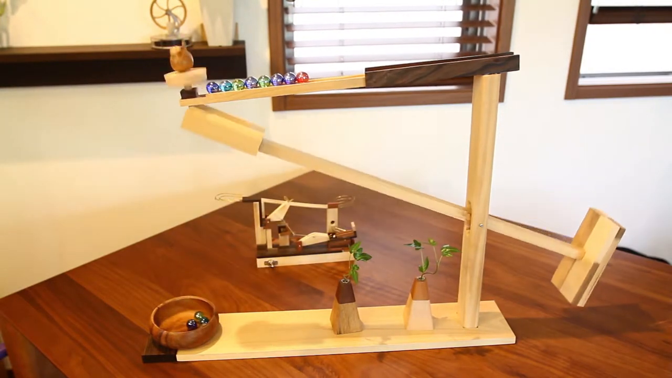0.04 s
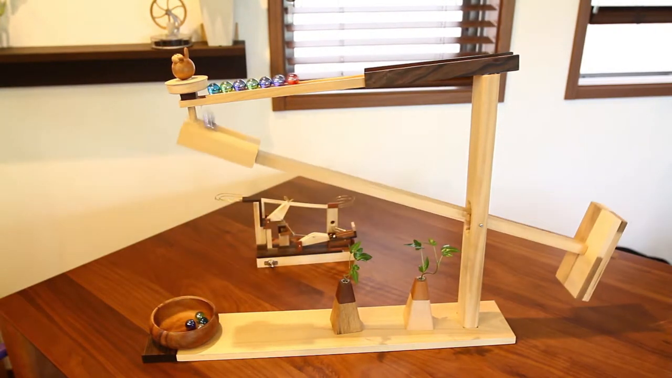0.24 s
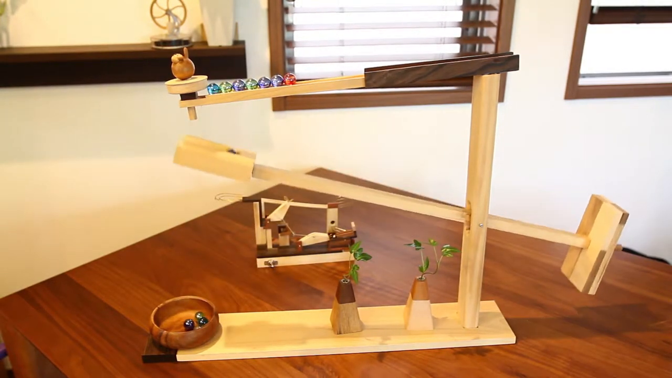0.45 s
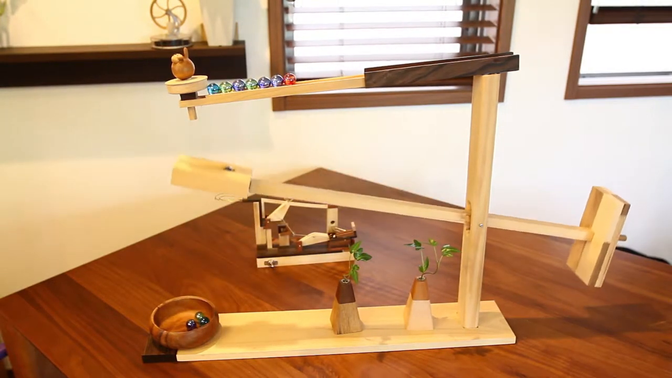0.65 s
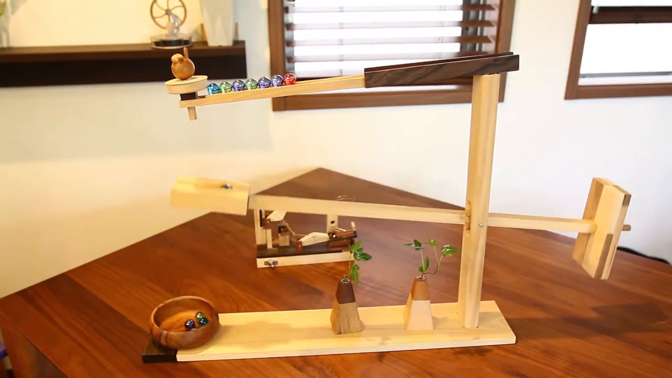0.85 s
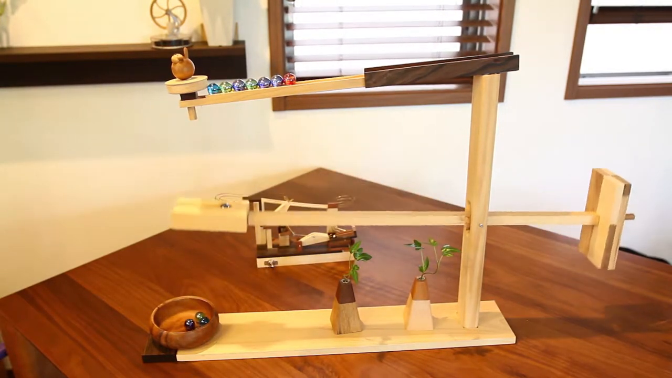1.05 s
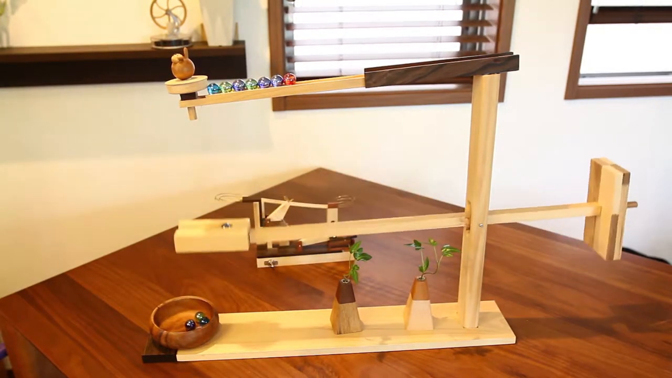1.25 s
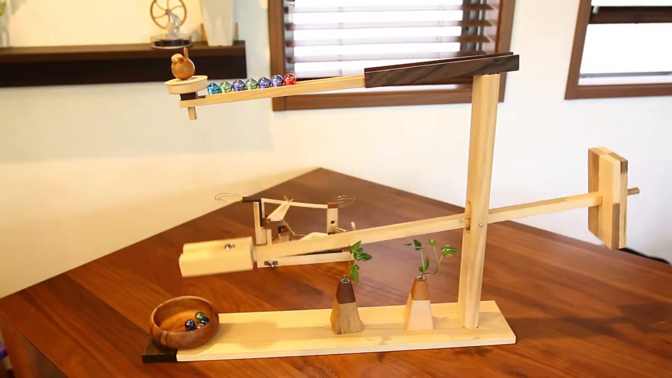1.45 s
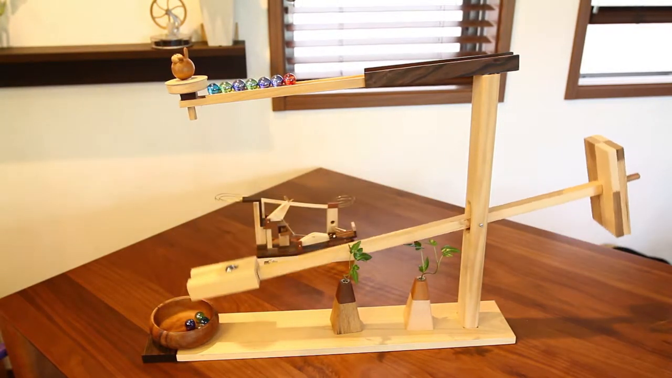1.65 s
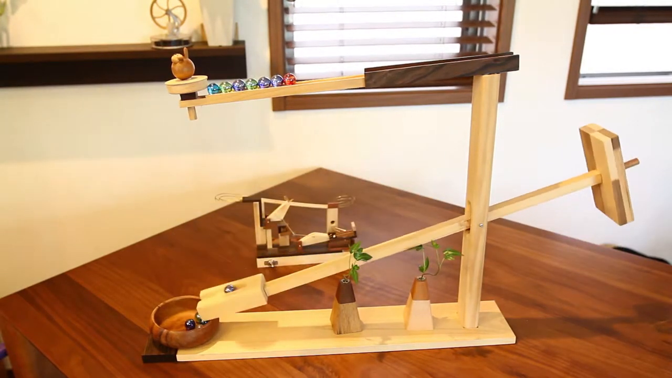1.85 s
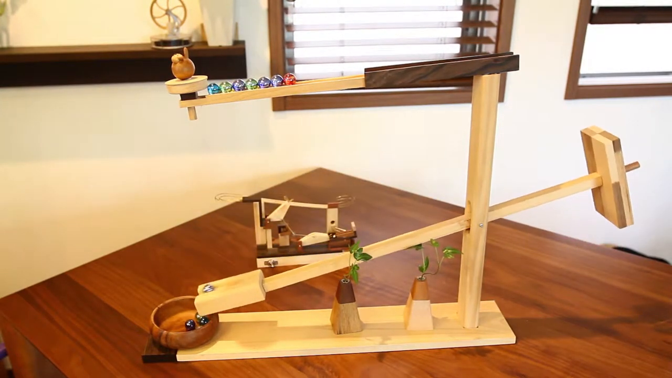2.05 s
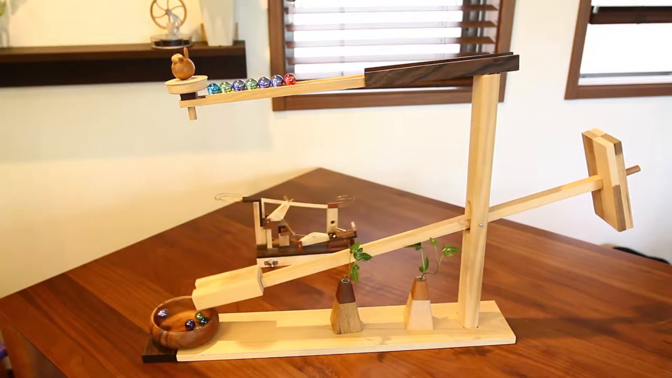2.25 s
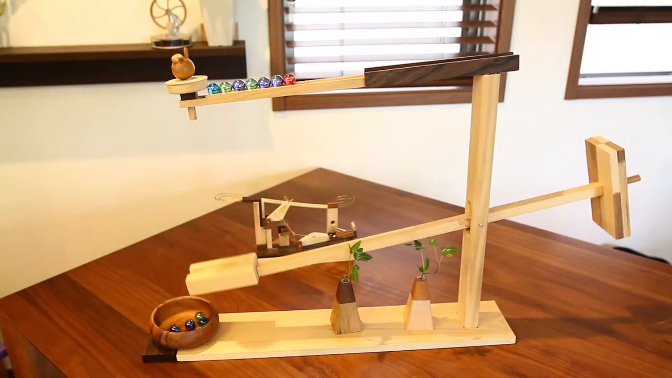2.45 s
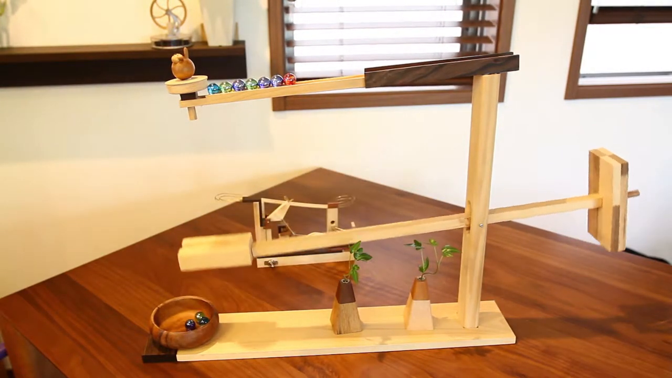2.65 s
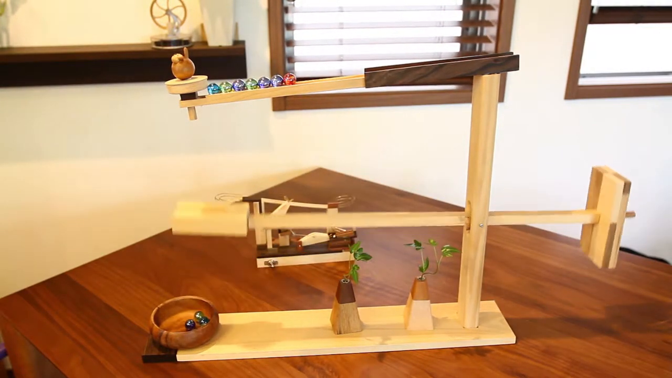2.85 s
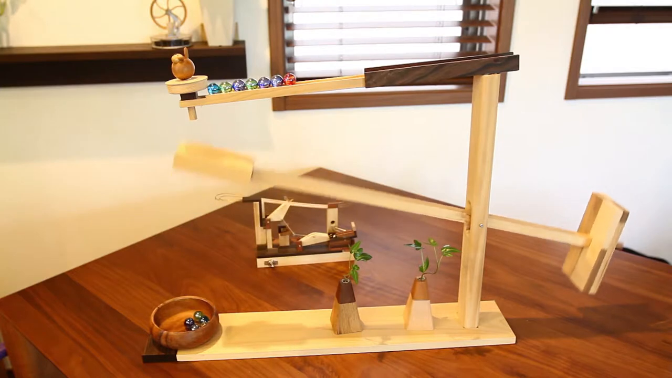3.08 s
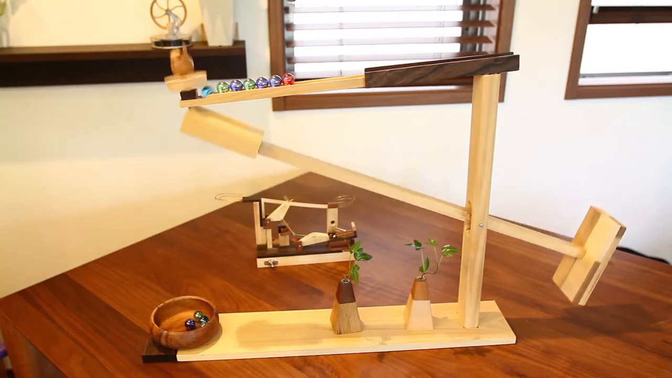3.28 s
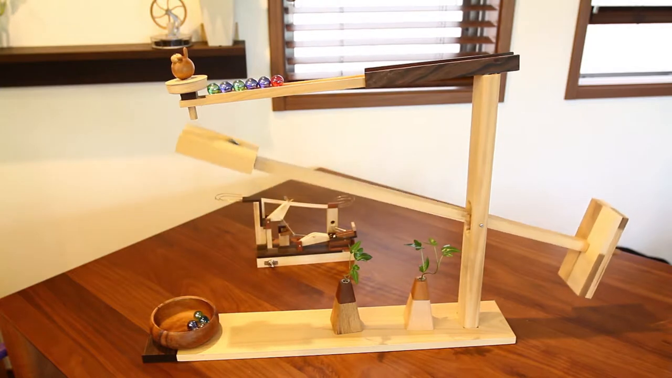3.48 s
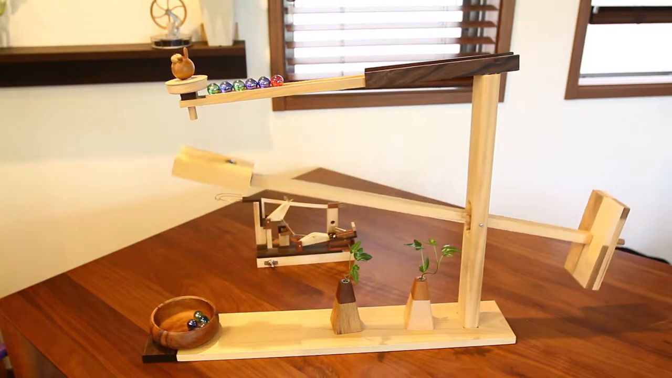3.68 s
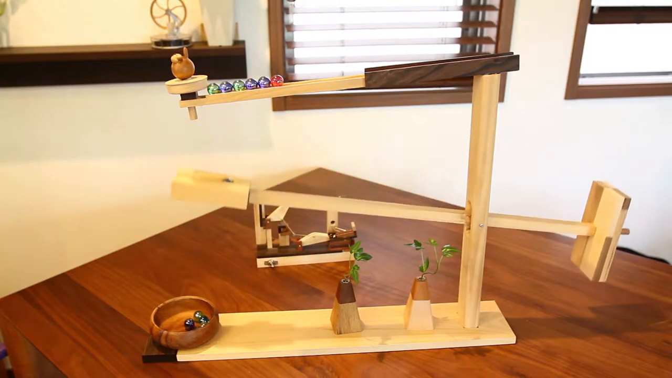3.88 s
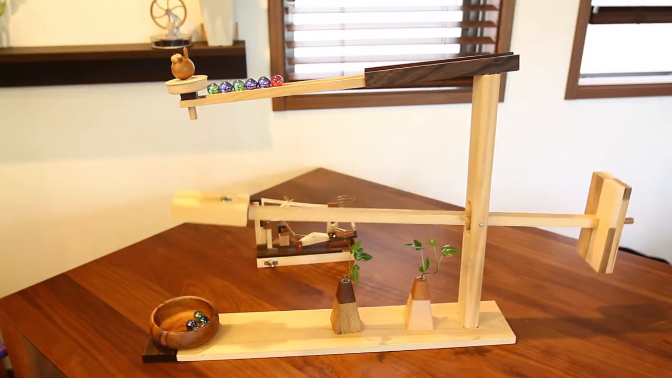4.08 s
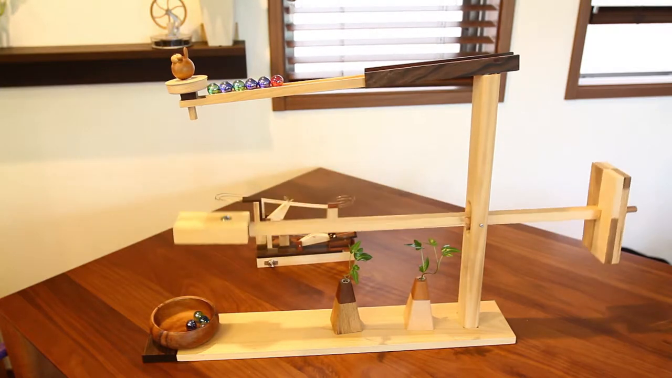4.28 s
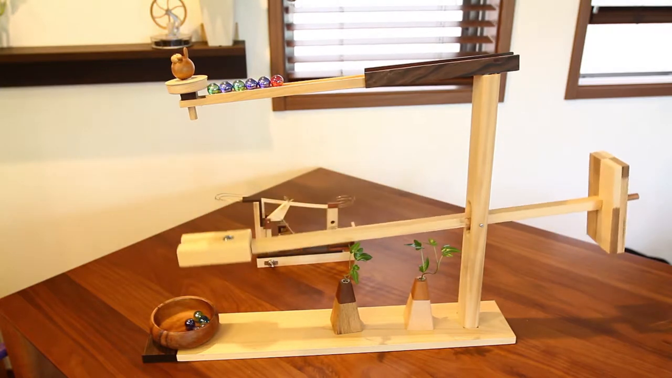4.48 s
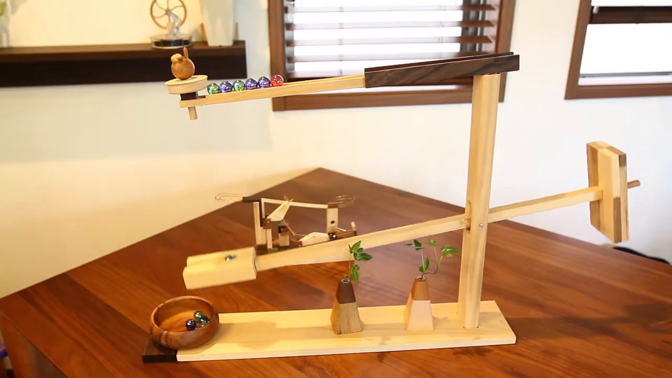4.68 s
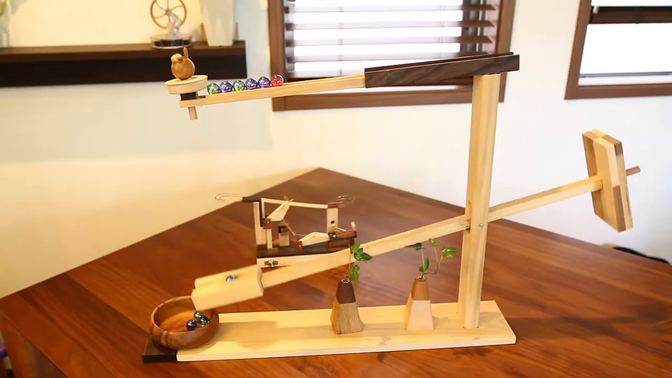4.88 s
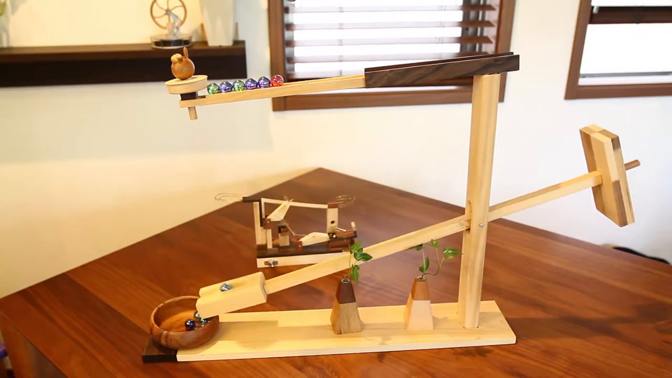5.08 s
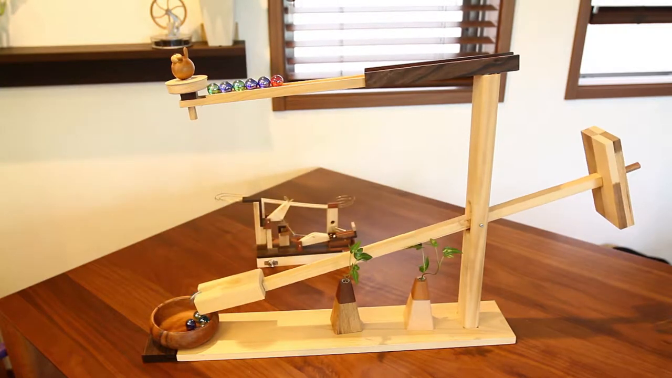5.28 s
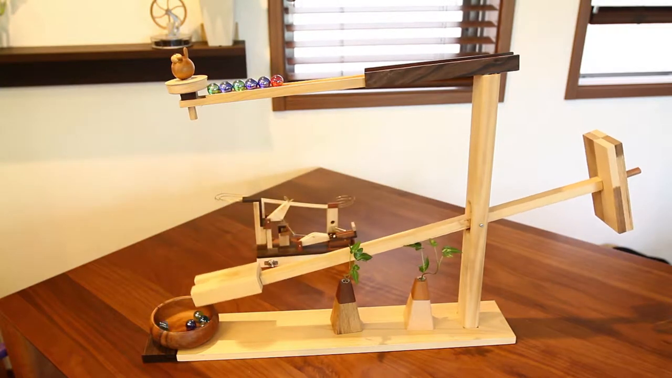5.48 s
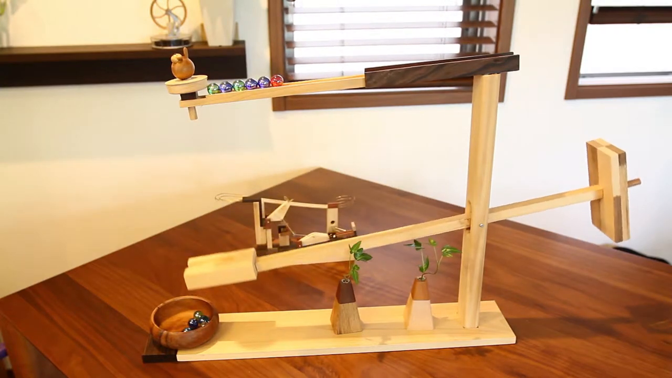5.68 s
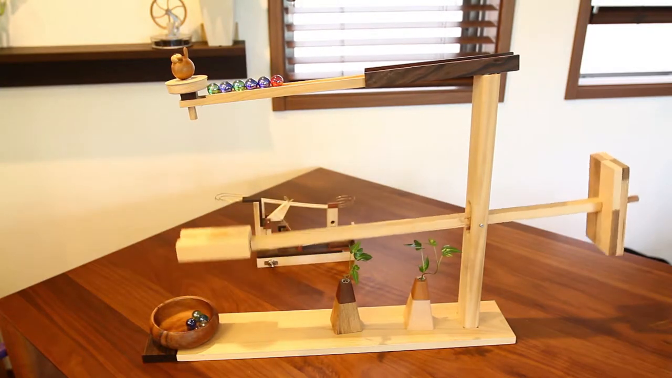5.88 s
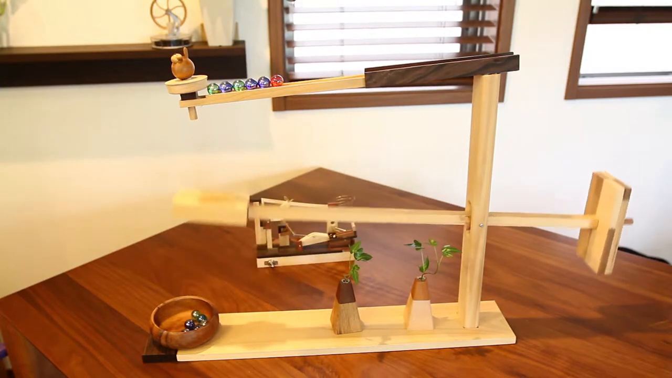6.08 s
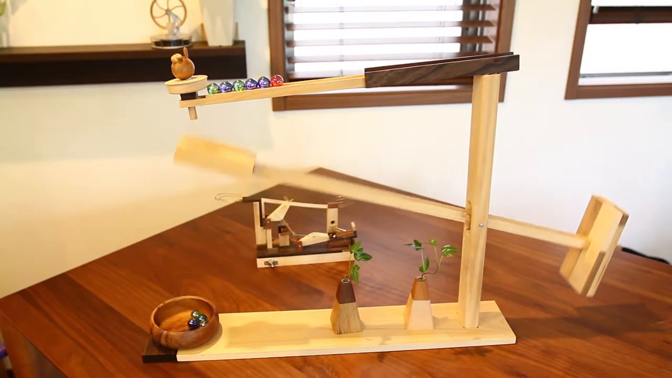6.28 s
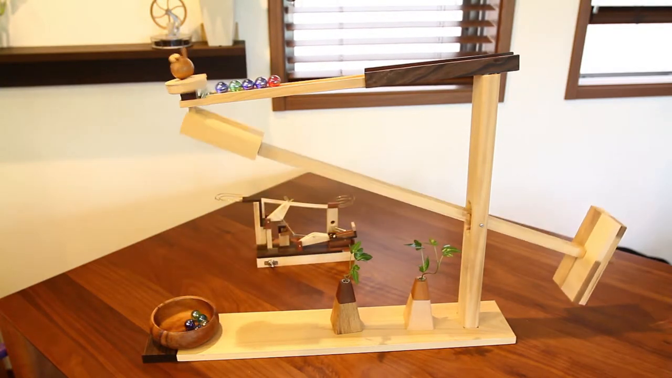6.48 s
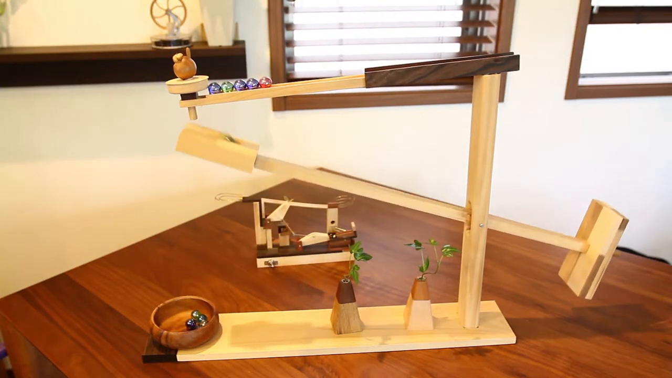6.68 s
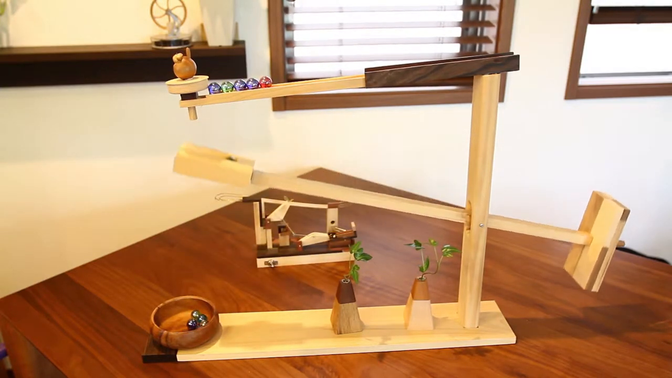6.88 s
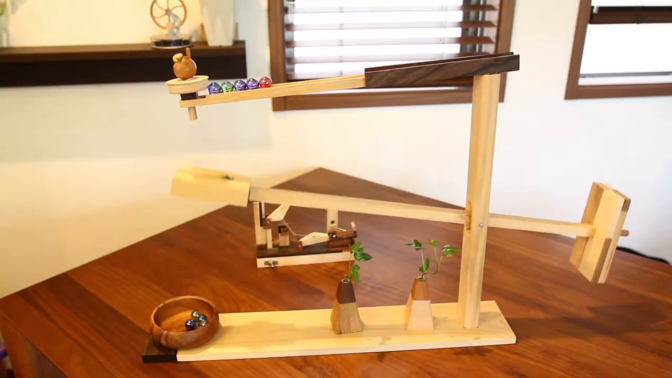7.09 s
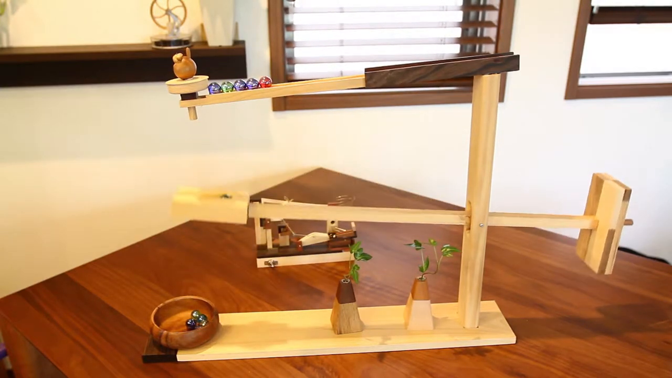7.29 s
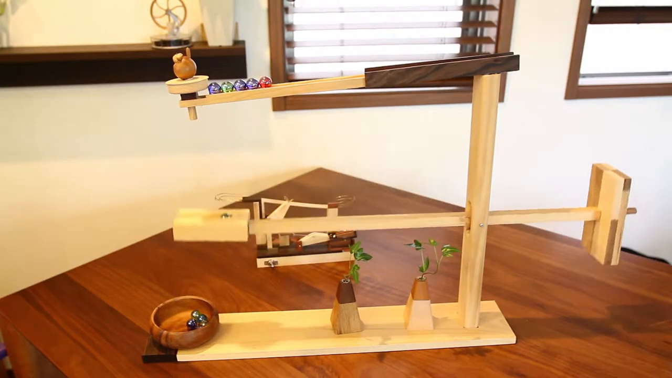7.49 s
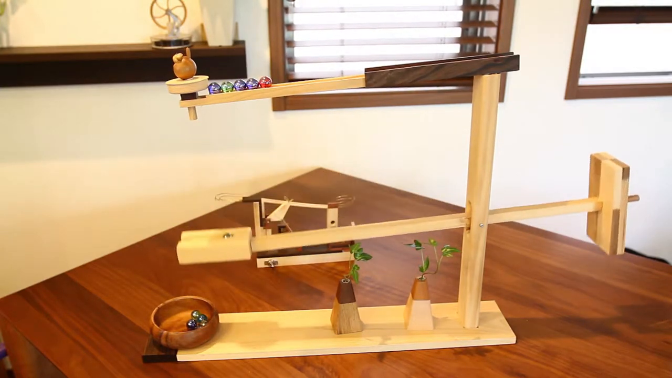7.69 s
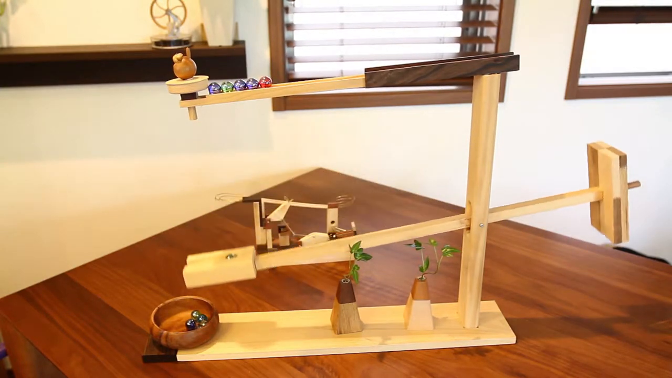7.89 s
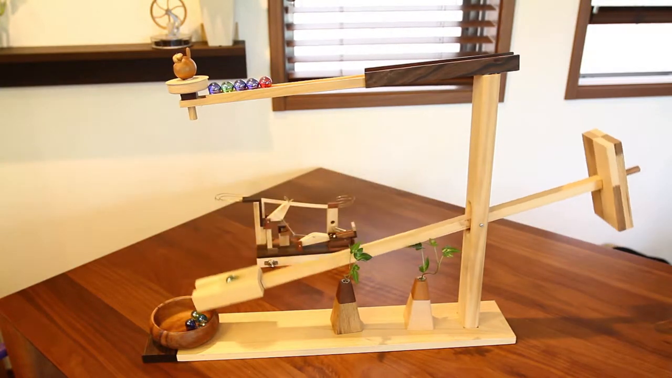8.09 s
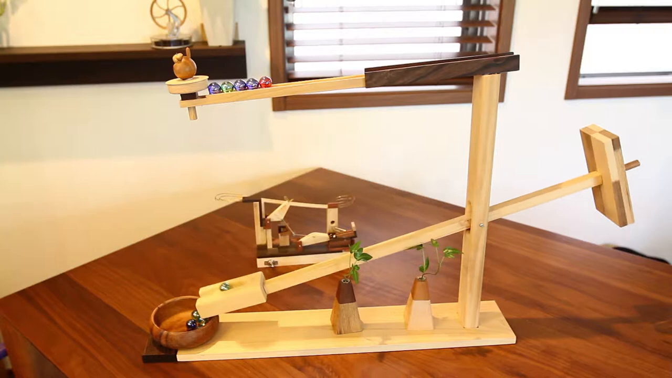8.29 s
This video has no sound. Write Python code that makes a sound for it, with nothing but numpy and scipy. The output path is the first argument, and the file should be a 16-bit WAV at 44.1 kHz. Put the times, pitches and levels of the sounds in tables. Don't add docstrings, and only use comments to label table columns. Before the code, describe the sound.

Faint low room tone and hiss run throughout, easing slightly. A close wooden marble toy starts with gate knocks and latch rattle at 0-0.2 s; queued marbles click and roll briefly around 0.25 s, and one knocks about in a hollow cup until about 0.5 s. Near silence follows. At 1.85-2.0 s the arm chatters on a bowl rim; at 2.2 s the marble cracks loudly onto other marbles, bounces woodily to 2.5 s, then clinks and circles softly until 3.0 s. The gate clatters again at 3.2 s, the cup catches at 3.4-3.6 s, the rim taps at 5.0 s, and the drop cracks at 5.4 s with bounces and fading clinks to 6.0 s. A third gate clatter at 6.4 s and catch at 6.6-6.75 s lead to a very faint creak at 7.1 s, a tiny high chirp at 8.13 s and final rim chatter from 8.2 s. Short room echoes; hard hits clip.

```python
import sys
import numpy as np
from scipy import signal
from scipy.fft import rfft, irfft
from scipy.io import wavfile
from scipy.ndimage import uniform_filter1d

SR = 44100
rng = np.random.default_rng(int(sys.argv[2]) if len(sys.argv) > 2 else 0)


def gain_from_decibels(decibels):
    exponent = np.asarray(decibels, float) / 20
    return 10 ** exponent


def waveform_to_disk(signal):
    frames = np.transpose(np.atleast_2d(signal))
    scaled = np.clip(frames, -1, 1) * 32767
    samples = np.round(scaled).astype(np.int16)
    wavfile.write(sys.argv[1], SR, samples)


N = 367794


def evened(x):
    return x / np.sqrt(np.mean(x ** 2) + 1e-20)


def read(points, hz):
    table_hz, value = np.transpose(points)
    return np.interp(np.log(hz + 1), np.log(table_hz + 1), value)


def add(mix, start_s, sound):
    part = mix[round(start_s * SR):][:len(sound)]
    part += sound[:len(part)]


CRACKS = [0.93, 1, 1.4, 1.7, 0.51, 0.1, 0.84]
GATE_CRACK, CUP_CRACK, RIM_CRACK, BOWL_CRACK, GLASS_CRACK, HOLLOW_CRACK, LATCH_CRACK = CRACKS


def ringing(modes, body, crack, sharp):
    hz, width_hz, db = np.transpose(modes)[:, :, None]
    t = np.arange(3072) / SR
    chance = rng.standard_normal((2, len(modes), 1))
    chance_db = 2 * chance[0]
    detune = 1 + .007 * chance[1]
    strength = width_hz * gain_from_decibels(db + chance_db)
    rings = strength * np.exp(-np.pi * width_hz * t) * np.sin(2 * np.pi * hz * detune * t)

    colour = gain_from_decibels(read(body, np.fft.rfftfreq(len(t), 1 / SR)))
    noise = evened(irfft(rfft(rng.standard_normal(len(t))) * colour))
    half = len(t) // 2 - 1
    folded = irfft(np.log(colour)) * np.r_[1, 2 * np.ones(half), 1, np.zeros(half)]
    click = irfft(np.exp(rfft(folded)))
    click_share = 2.94 * sharp
    spread = 0.56 * sharp * np.exp(-t / 0.00014) + np.exp(-t / 0.0042)
    burst = evened(noise * spread - click_share * click / np.linalg.norm(click))
    return evened(rings.sum(0)) + crack * burst


def blow(part, ring_db, knock_db, clack_db, tick_db, tick_hz, sharp, tick_s):
    x = ringing(*part, sharp=sharp)
    knock = signal.lfilter(*signal.butter(3, 1900, "low", fs=SR), x)
    clack = signal.lfilter(*signal.butter(2, (1600, 3700), "band", fs=SR), x)
    ring = signal.lfilter(*signal.butter(3, 3600, "high", fs=SR), x)
    t = np.arange(len(x)) / SR
    pulse = np.exp(-t / tick_s) * np.sin(2 * np.pi * tick_hz * t)
    grains = np.exp(-t / 0.0022) * rng.standard_normal(len(t))
    scatter = np.convolve(grains, pulse[:40])[:len(t)]
    tick = signal.lfilter(*signal.butter(3, 4400, "high", fs=SR), pulse + .24 * scatter)
    layers = [(knock, knock_db - 7.5), (clack, clack_db - 4.5), (ring, -1.5), (tick, tick_db + 3.0)]
    loudest_db = ring_db + max(knock_db, clack_db, tick_db, 0)
    hard_db = .5 * max(loudest_db + 16.5, 0)
    return sum(gain_from_decibels(ring_db + hard_db + db) * layer / abs(layer).max() for layer, db in layers)


DELAY_S = .0001
# clack_db at an even knock, clack_db per knock_db, tick_hz, first contact (ratio)
WOOD_TONES = [(3, 0.63, 8040, 0.37), (-27.5, -0.65, 8300, 0.75), (3.5, 0.08, 6700, 1.1),
              (-17.5, -1.5, 6700, 0.75), (6, 5, 11000, .6)]
GATE_TONE, CUP_TONE, RIM_TONE, BOWL_TONE, FLOOR_TONE = WOOD_TONES


def wood_blows(blows, part, tone):
    out = np.zeros(N)
    even_db, follow, tick_hz, sharp = tone
    for start_s, ring_db, knock_db, tick_db, *extra_db in blows:
        clack_db = even_db + follow * knock_db + sum(extra_db)
        sound = blow(part, ring_db, knock_db, clack_db, tick_db, tick_hz, sharp, tick_s=.00034)
        add(out, start_s + DELAY_S, sound)
    return out


# knock_db, clack_db, clack_db per ring_db, knock_db per ring_db
GLASS_TONES = [(-12, -5, .1, 0.94), (-0.5, -4.5, 0.13, 0.068), (-11.5, 4.44, 0.1, 0.1)]
QUEUE_TONE, GLASS_TONE, HEAP_TONE = GLASS_TONES


def glass_blows(blows, part, tone):
    out = np.zeros(N)
    base_knock_db, base_clack_db, clack_follow, knock_follow = tone
    for start_s, ring_db, tick_db, tick_hz in blows:
        knock_db = base_knock_db + knock_follow * ring_db
        clack_db = base_clack_db + clack_follow * ring_db
        sound = blow(part, ring_db, knock_db, clack_db, tick_db, tick_hz, sharp=2.9, tick_s=.00011)
        add(out, start_s + DELAY_S, sound)
    return out


# rise_s, fall_db per second
BURSTS = [(.004, 80), (.004, 260), (.004, 147), (0.02, 108), (0.013, 115), (0.032, 11.5)]
GATE_BURST, RIM_BURST, BOWL_BURST, CUP_BURST, QUEUE_BURST, CIRCLE_BURST = BURSTS


def chatter(rows, burst, part, level_db, per_s=380, uneven_db=5.5):
    out, t = np.zeros(N), np.arange(N) / SR
    rise_s, fall_db = burst
    gain = np.zeros(N)
    for start_s, db, length_s in rows:
        times_s = [start_s, start_s + rise_s, start_s + rise_s + abs(length_s)]
        levels_db = [db - 5, db, db - fall_db * length_s]
        gain += gain_from_decibels(np.interp(t, times_s, levels_db, left=-200, right=-200))
    size = np.minimum(rng.exponential(1, N), 2.5)
    taps = gain_from_decibels(uneven_db * size) * (rng.random(N) < per_s / SR)
    spot = rng.integers(0, 4, N)
    for k in range(4):
        tap = ringing(*part, sharp=0.43)
        out += signal.oaconvolve(gain * taps * (spot == k), tap / np.linalg.norm(tap))[:N]
    return gain_from_decibels(level_db) * out / np.sqrt(np.mean(taps ** 2))


# pitch_hz, level_db per Hz
AIR_COLOUR = [(15, -37.5), (25, -22), (49, -7.5), (76, -37), (107, -3.5), (179, -8), (205, -13),
              (235, -1.5), (382, -6), (487, -2.5), (638, -7), (1190, -9), (2090, -16.5), (13100, -30.5),
              (15800, -35.5)]
# start_s, level_db
AIR_LEVEL = [(0, -47.5), (2, -48.5), (5, -49), (8.4, -50.5)]


def air():
    frames, hz = N // 256 + 5, np.fft.rfftfreq(1024, 1 / SR)
    a, b, patches = rng.standard_normal((frames, 513, 3)).T
    patches = uniform_filter1d(patches, size=10, axis=0)
    patches_db = evened(uniform_filter1d(patches, size=14, axis=1))
    z = (a + 1j * b) * gain_from_decibels(read(AIR_COLOUR, hz)[:, None] + patches_db)
    hiss = signal.istft(z, nperseg=1024, noverlap=768)[1][:N]
    level_db = np.interp(np.arange(N) / SR, *np.transpose(AIR_LEVEL))
    return gain_from_decibels(level_db) * evened(hiss)


# knock_db, tick_db, extra clack_db
GATE_BLOWS = [(0.0289, -7.5, -2.5, -25, 4.5), (0.0336, -22, 17.5, -28.5, -2), (.045, -25.5, 16, 2, -13),
              (0.083, -14.5, -5, -13, -5), (0.1245, -15.5, 7, -8.5, 1.5), (.138, -15, 9, -28, 2),
              (0.1566, -13, -4, -14, -10), (0.168, -28, -4, -26.5, 3), (3.1835, -30.5, 14, -6, -0.5),
              (3.192, -19.5, -3, -19, -6.5), (3.2074, -12, 4, -22, 3), (3.213, -18.5, 16, -17, -7),
              (3.2237, -19.5, 5, -1, 5), (3.261, -29, 0, 4, 2), (3.265, -24, 5, -25, -10),
              (3.2893, -24.5, 18, -33, 2), (3.305, -21.5, -2, -7, 1), (3.331, -6.5, -3, -9, -1.5),
              (6.361, -24.5, 9, -14, -3), (6.372, -19, -24.5, -15.5, 1), (6.3896, -15, 10.5, -25, -1),
              (6.4064, -16.5, 10, -2, 1), (6.412, -15.5, 3, -17, 2.5), (6.4507, -11, 0.5, -11, 3),
              (6.474, -15.5, 0, -9, 7.5), (6.496, -25, 16, -5, -13), (6.5232, -12, -2, -18, 5)]
# pitch_hz, width_hz, level_db
GATE_MODES = [(198, 22, 4.5), (364, 32, -1), (568, 28, 7), (856, 21, 6), (11800, 700, -16.5),
              (1344, 46, 16.5), (1656, 70, -13), (2220, 78, -2), (2876, 30, 0), (3180, 61, -2),
              (4240, 47, 6), (4110, 110, -6), (5950, 80, -11.5)]
# pitch_hz, level_db per Hz
GATE_BODY = [(59, -45), (100, -20), (190, -0.5), (722, -18.5), (888, -2.5), (1680, -1), (2070, 0),
             (2360, -1), (9000, -40.5), (11700, -53), (19800, -120)]
# pitch_hz, width_hz, level_db
LATCH_MODES = [(210, 123, -22.5), (892, 28, 10), (1280, 36, -14.5), (1703, 31, 7.5), (1870, 15, -14),
               (2371, 56, 7.5), (2720, 89, -1.5), (3350, 910, -3)]
# start_s, level_db, length_s
GATE_CHATTER = [
    (.042, -16, 0.12),
    (.124, -19.5, 0.12),
    (3.217, -16.5, 0.03),
    (3.265, -14, 0.11),
    (6.391, -16, 0.05),
    (6.449, -15.5, 0.094),
]


def gate():
    latch = LATCH_MODES, GATE_BODY, LATCH_CRACK
    rattle = chatter(GATE_CHATTER, GATE_BURST, latch, level_db=-3.0, per_s=300, uneven_db=3.0)
    return rattle + wood_blows(GATE_BLOWS, (GATE_MODES, GATE_BODY, GATE_CRACK), GATE_TONE)


# start_s, ring_db, tick_db over the ring, tick_hz
QUEUE_CLICKS = [(0.2376, -31.5, 15.5, 8700), (0.248, -23, 5, 9500), (0.254, -34, -1, 9500),
                (0.289, -31, 10, 9450), (0.802, -40, -3, 11800), (3.421, -28, 16.5, 9300),
                (4.0796, -43, 4.5, 6640), (6.5907, -28, -2, 9000), (6.6030, -24, 12, 9500),
                (6.612, -30, 12, 8930)]
# start_s, level_db, length_s
QUEUE_ROLL = [
    (.243, -10.5, 0.093),
    (3.42, -30.5, 0.073),
    (6.585, -23.5, 0.068),
]
# pitch_hz, width_hz, level_db
QUEUE_MODES = [(8200, 720, -6), (9500, 540, 2.5), (11150, 2200, -21)]


def queue():
    rolling = chatter(QUEUE_ROLL, QUEUE_BURST, (QUEUE_MODES, GLASS_BODY, .15), level_db=-14.5)
    return rolling + glass_blows(QUEUE_CLICKS, (CUP_MODES, CUP_BODY, CUP_CRACK), QUEUE_TONE)


# knock_db, tick_db
CUP_BLOWS = [(0.2721, -11, 0, -28), (0.3555, -24, 8, -20), (0.363, -11, 0.5, -21), (0.3780, -10, -3, -25),
             (0.4452, -15.5, 3.5, -22), (2.086, -43, -3, -11), (2.114, -48, 25.5, -13.5),
             (3.4, -26, 0, -10), (3.4085, -11, -8, -25), (3.4185, -4.5, -16, -35),
             (3.4258, -13.5, -14, -21.5), (3.4475, -7, -12, -30), (3.4594, -31, 7, -19.5),
             (3.483, -17, -1, -20), (3.5066, -14, 0, -31), (3.514, -14, 3, -21), (3.545, -25, -9, -22),
             (3.5713, -36, 11, -19), (3.6105, -25.5, 11.5, -35.5), (5.284, -38, 8.5, -23.5),
             (5.299, -54.5, 15.5, -23.5), (6.566, -9, -0.5, -15.5), (6.6647, -22, 7.5, -1.5),
             (6.716, -34.5, 18, -19.5), (6.7267, -2.5, -10.5, -3)]
# pitch_hz, width_hz, level_db
CUP_MODES = [(236, 17, 7), (349.7, 34, 2), (560.3, 25, 10.5), (1377, 17, 15.5), (4030, 120, -3.5),
             (4273, 55, 6.5), (5900, 67, -11), (9000, 440, -18)]
# pitch_hz, level_db per Hz
CUP_BODY = [(59, -63), (100, -11), (233, -9.5), (434, -22), (555, -21), (750, -10), (1370, 0), (1780, -3.5),
            (9000, -30), (11700, -49), (19800, -120)]
# start_s, level_db, length_s
CUP_ROLL = [
    (0.386, -23.5, 0.12),
    (2.08, -41.5, .12),
    (3.512, -25.5, 0.22),
    (5.262, -37, 0.09),
    (6.72, -23, 0.14),
]
# pitch_hz, width_hz, level_db
HOLLOW_MODES = [(564.6, 17, -2), (1390, 32, 0)]


def cup():
    hollow = HOLLOW_MODES, CUP_BODY, HOLLOW_CRACK
    rolling = chatter(CUP_ROLL, CUP_BURST, hollow, level_db=-5.5, per_s=150, uneven_db=2.0)
    return rolling + wood_blows(CUP_BLOWS, (CUP_MODES, CUP_BODY, CUP_CRACK), CUP_TONE)


# knock_db, tick_db, extra clack_db
RIM_BLOWS = [(1.85, -27.5, 19.5, -38, 10.5), (1.8584, -25, 9, -17, 7.5), (1.8927, -14, 7.5, -27, -1),
             (1.9140, -13, 9, -10.5, 5), (1.9183, -15.5, 1, -17, 3.5), (1.9303, -11.5, -8, -26, 2.5),
             (5.0100, -29, 19.5, -16.5, 0), (5.0530, -16.5, 10, -12, -7), (5.068, -25, 16, -13.5, -11),
             (5.0908, -25, 10, -16, 4.5), (8.1990, -24, 16.5, -13, 1), (8.237, -21, 17.5, -23, 5.5),
             (8.2545, -14.5, -10, -20, 4.5), (8.2662, -14.5, -6, -15, 4), (8.281, -13, -2, -35, 3.5)]
# pitch_hz, width_hz, level_db
RIM_MODES = [(240, 30, -17.5), (350.4, 45, -8), (534, 27, -7), (840, 42, -15.5), (1005, 60, -4),
             (1140, 72, 0.5), (1570, 110, -3), (2063, 94, -7.5), (3055, 140, 0), (3380, 71, -13),
             (4520, 140, -6.5), (4980, 230, -16)]
# pitch_hz, level_db per Hz
RIM_BODY = [(59, -38), (100, -29), (242, 0.5), (468, -11), (514, -9), (1110, -0.5), (1890, -7),
            (2960, -6.5), (4900, -17.5), (9000, -32.5), (11700, -32), (19800, -120)]
# start_s, level_db, length_s
RIM_CHATTER = [
    (1.854, -15, .04),
    (1.893, -12.5, .11),
    (5.016, -17.5, .038),
    (5.047, -14, .1),
    (8.198, -15.5, .035),
    (8.238, -11, .1),
]


def rim():
    part = RIM_MODES, RIM_BODY, RIM_CRACK
    return chatter(RIM_CHATTER, RIM_BURST, part, level_db=-10.0) + wood_blows(RIM_BLOWS, part, RIM_TONE)


# start_s, ring_db, tick_db over the ring, tick_hz
DROPS = [
    (2.2094, 1.5, -7.5, 6460),
    (2.2123, -1, -9, 6360),
    (2.2175, -23, -2.5, 8300),
    (5.3841, 3, -11.5, 6310),
    (5.388, -5, 1, 6300),
    (5.4305, -17.5, -3, 5000),
]
# pitch_hz, width_hz, level_db
HEAP_MODES = [(575, 110, -14), (1120, 250, 0), (1510, 210, -6.5), (3230, 390, 0.5), (2500, 500, -15),
              (4530, 600, 2), (5630, 450, -11), (6700, 310, -4.5), (9450, 880, -7.5), (11000, 600, -14.5),
              (8300, 500, -12.5)]
# pitch_hz, level_db per Hz
HEAP_BODY = [(100, -35), (300, -26), (1900, -16.5), (2500, -19), (3300, -11.5), (5000, 1.5), (7000, -1),
             (11700, -19), (19800, -102)]


def heap():
    return glass_blows(DROPS, (HEAP_MODES, HEAP_BODY, 1.1), HEAP_TONE)


# knock_db, tick_db
BOUNCES = [
    (2.282, -12, 0, -13),
    (2.2867, -10, -9, -2),
    (5.4687, -13, 0.5, -10),
    (5.4745, -8, -8.5, -12.5),
    (5.478, -16.5, -13, 2),
]
# pitch_hz, width_hz, level_db
FLOOR_MODES = [(1090, 75, 21.5), (2530, 73, 10), (4160, 140, 4), (6300, 190, 7.5), (8070, 300, -8),
               (10900, 340, 0)]
# knock_db, tick_db
BOWL_BLOWS = [
    (2.3311, -9.5, 3.5, -10),
    (2.346, -23.5, -18, -30),
    (2.3727, -9.5, -1, -16),
    (5.5022, -5.5, -2.5, -7.5),
    (5.5102, -6, -4, -20),
    (5.53, -9.5, -8, -10),
]
# pitch_hz, width_hz, level_db
BOWL_MODES = [(351, 36, 2.5), (1110, 16, 12.5), (1675, 180, 9.5), (2800, 51, -14), (3000, 84.7, 13),
              (4535, 150, -6.5), (4750, 180, -14), (5140, 250, 6), (4590, 220, 5.5), (5030, 200, 6.5)]
# pitch_hz, level_db per Hz
BOWL_BODY = [(59, -64), (100, -27), (994, -9.5), (1110, -8.5), (2190, -11.5), (2960, -7), (3790, -14),
             (4570, 1.5), (9000, -49), (11700, -51), (19800, -120)]
# start_s, level_db, length_s
BOWL_CHATTER = [
    (2.329, -10, 0.22),
    (5.504, -11.5, 0.15),
]


def bowl():
    part = BOWL_MODES, BOWL_BODY, BOWL_CRACK
    out = wood_blows(BOUNCES, (FLOOR_MODES, BOWL_BODY, .25), FLOOR_TONE)
    out += wood_blows(BOWL_BLOWS, part, BOWL_TONE)
    return out + chatter(BOWL_CHATTER, BOWL_BURST, part, level_db=-7.0, per_s=800, uneven_db=4.0)


# start_s, ring_db, tick_db over the ring, tick_hz
GLASS_BLOWS = [(2.616, -17.5, 2, 8800), (2.776, -35.5, 15.5, 7760), (2.917, -25, 7.5, 8100),
               (2.966, -23, 7.5, 9900), (3.013, -34, 11.5, 8000), (3.024, -39, -5, 5430),
               (5.6278, -28, -7, 6370), (5.634, -38, -14, 6300), (5.6483, -22, 8, 9600),
               (5.762, -35, 12, 8040), (5.8023, -29, 12.5, 8100), (5.908, -29, 2, 7900),
               (5.9948, -49, 7, 6130)]
# pitch_hz, width_hz, level_db
GLASS_MODES = [(3370, 76, -17), (4450, 270, -8), (5380, 200, 5), (6400, 34, 2), (8700, 57, -28),
               (10000, 74, -9), (11350, 190, 6)]
# pitch_hz, level_db per Hz
GLASS_BODY = [(59, -52), (100, -27), (304, 1.5), (1050, -4.5), (1110, 15.5), (1890, -14), (3260, 2.5),
              (6660, -4.5), (9000, -20), (11700, -39), (19800, -120)]
# start_s, level_db, length_s
BOWL_ROLL = [
    (2.602, -42.5, 0.39),
    (5.75, -49.5, 0.26),
]


def marbles():
    circling = chatter(BOWL_ROLL, CIRCLE_BURST, (RIM_MODES[3:7], CUP_BODY, .8), level_db=-10)
    return circling + glass_blows(GLASS_BLOWS, (GLASS_MODES, GLASS_BODY, GLASS_CRACK), GLASS_TONE)


# start_s, level_db, pitch_hz, length_s
SQUEAKS = [
    (7.1, -55, 500, 0.15),
    (8.109, -51, 2770, 0.013),
    (8.13, -40.5, 3190, 0.013),
    (8.137, -51.5, 3265, 0.043),
]


def pivot():
    out = np.zeros(N)
    for start_s, db, hz, length_s in SQUEAKS:
        t = np.arange(round(length_s * SR)) / SR
        tone = np.zeros(len(t))
        for k, over_db in enumerate([0, -24, -26], 1):
            tone += gain_from_decibels(over_db) * np.sin(2 * np.pi * k * hz * t)
        add(out, start_s, gain_from_decibels(db) * tone * signal.windows.tukey(len(t), .5))
    return out


# delay_s, level_db
ECHOES = [
    (.0041, -12),
    (.0083, -11),
]
# pitch_hz, length_s
ROOM_FALL = [(100, 0.59), (400, 0.33), (1500, 0.42), (5000, 0.42), (9000, 0.33), (15000, 0.19)]
# pitch_hz, level_db
ROOM_COLOUR = [(100, -1.5), (350, 7.5), (470, 11), (570, 6.5), (1500, 3), (5000, 1), (9000, 1),
               (15000, 9.5)]


def room(x):
    out, t = x.copy(), np.arange(N) / SR
    for delay_s, db in ECHOES:
        add(out, delay_s, gain_from_decibels(db) * x)
    for k in range(3):
        taps = np.zeros(SR)
        at = np.arange(240, SR - 20, 20)
        taps[at + rng.integers(0, 20, len(at))] = rng.choice([-1., 1.], len(at))
        hz, late_s, z = signal.stft(taps, SR, nperseg=256)
        fall_db = 60 * late_s / read(ROOM_FALL, hz)[:, None]
        shaped = z * gain_from_decibels(read(ROOM_COLOUR, hz)[:, None] - fall_db)
        tail = signal.istft(shaped, SR, nperseg=256)[1]
        turn = np.sqrt(2 / 3) * abs(np.cos(np.pi * (3 * t + k / 3)))
        out += signal.oaconvolve(x * turn, tail / np.linalg.norm(tail))[:N]
    return out


# edge_hz, kind of filter
MICROPHONE = [(120, "high"), (12500, "low"), (14500, "low")]


def scene():
    clatter = gate() + queue() + rim() + heap() + bowl() + marbles() + pivot()
    hum = cup()
    near = room(clatter + 0.75 * hum) + 0.42 * hum
    for hz, kind in MICROPHONE:
        near = signal.lfilter(*signal.butter(2, hz, kind, fs=SR), near)
    return (near + air())[None]


def top_cut(x):
    return signal.sosfilt(signal.butter(12, 15980, fs=SR, output="sos"), x)


def record(dry):
    hold = np.exp(-1 / (0.0046 * SR))
    power = signal.lfilter([1 - hold], [1, -hold], dry[0] ** 2)
    power_db = 10 * np.log10(power + 1e-12)
    fall_db = np.arange(N) * 86.0 / SR
    held_db = np.maximum.accumulate(power_db + fall_db) - fall_db
    over_db = np.maximum(held_db + 17.0, 0)
    lag = np.exp(-1 / (0.0036 * SR))
    pressed = dry / gain_from_decibels(0.68 * signal.lfilter([1 - lag], [1, -lag], over_db))
    return top_cut(np.clip(pressed, -1, 1))


dry = scene()
out = record(dry)
waveform_to_disk(out)
```